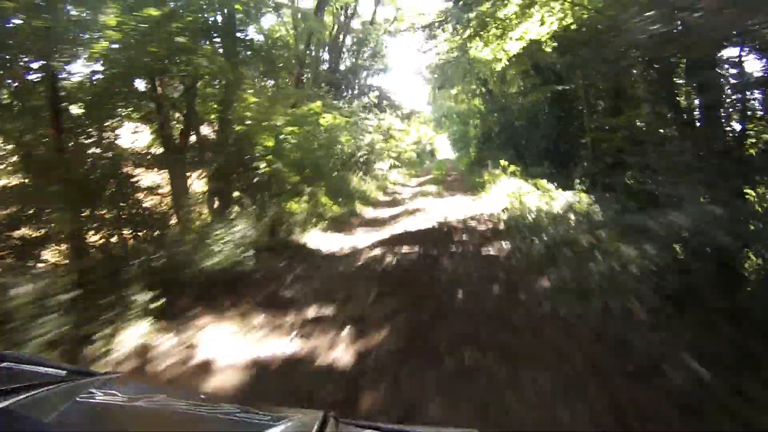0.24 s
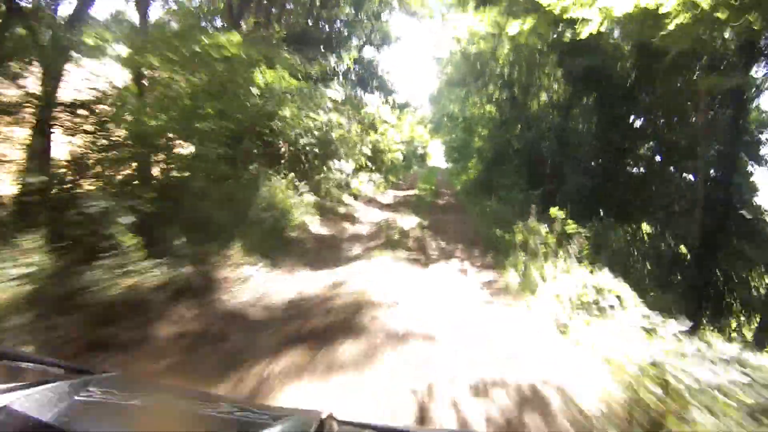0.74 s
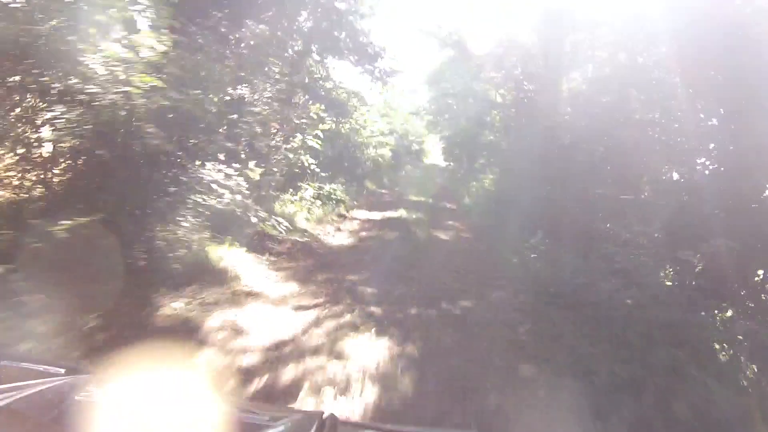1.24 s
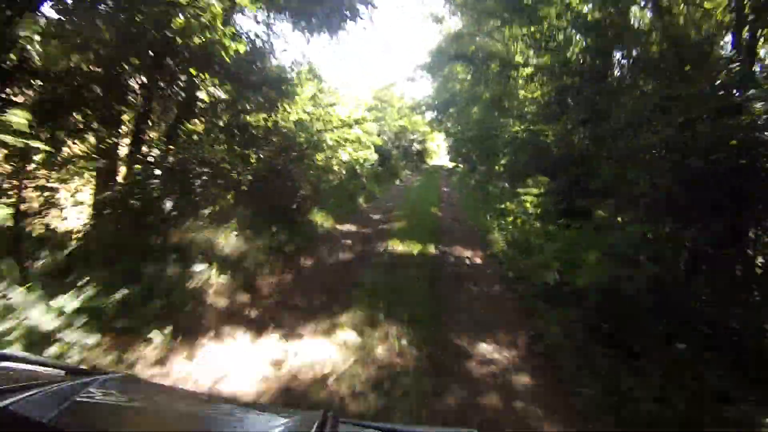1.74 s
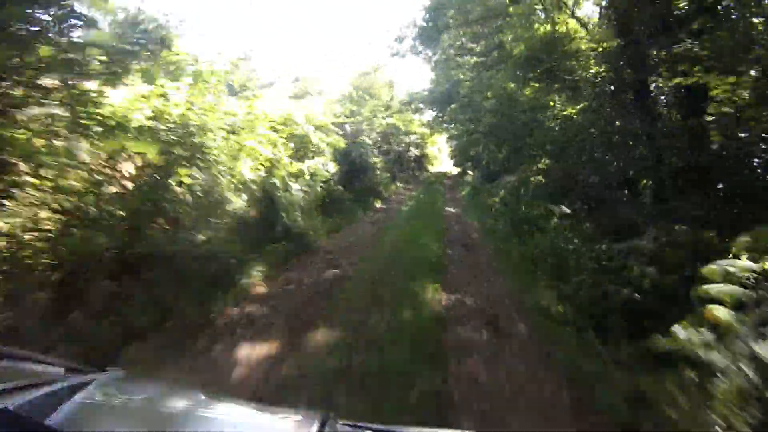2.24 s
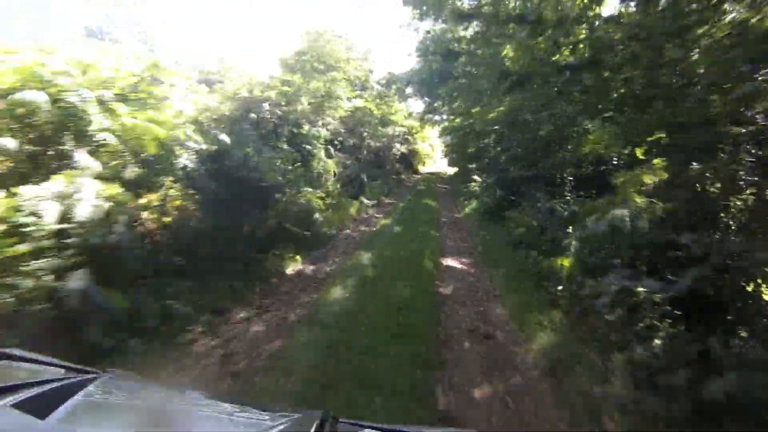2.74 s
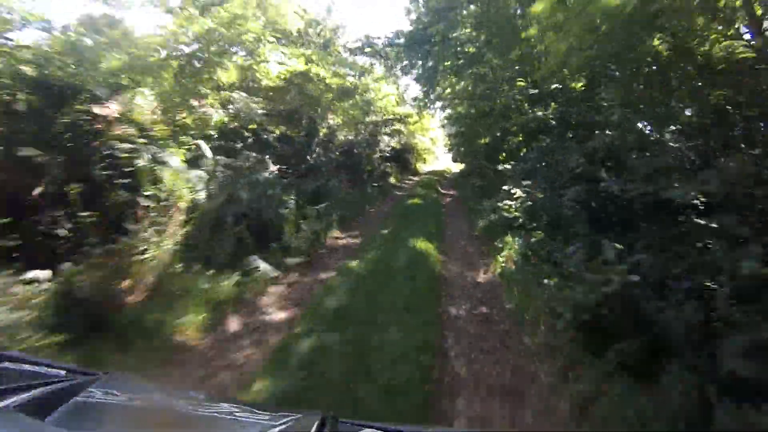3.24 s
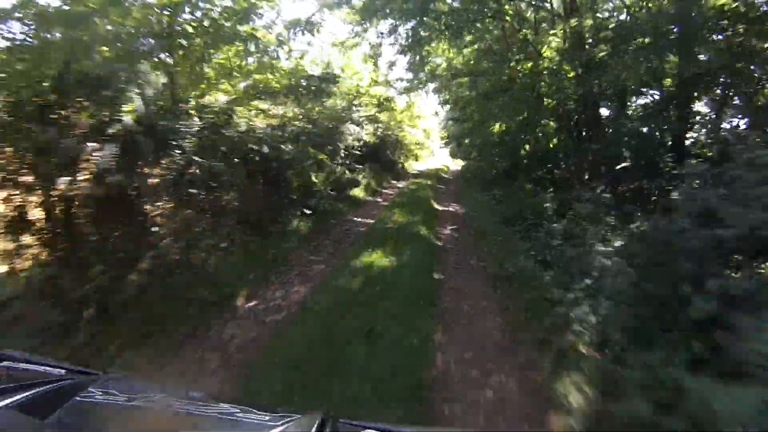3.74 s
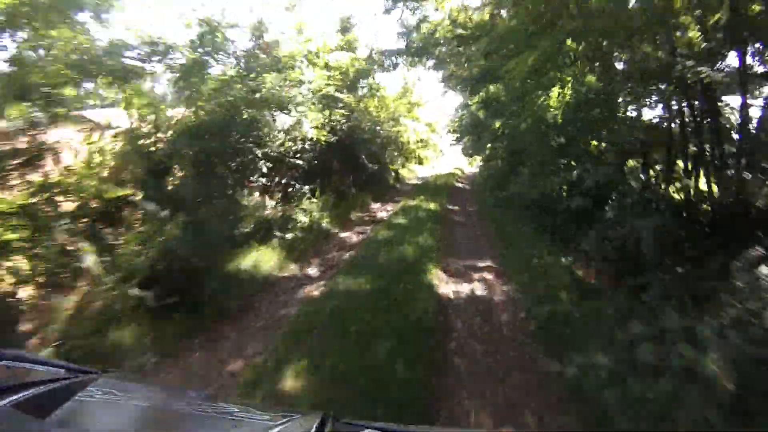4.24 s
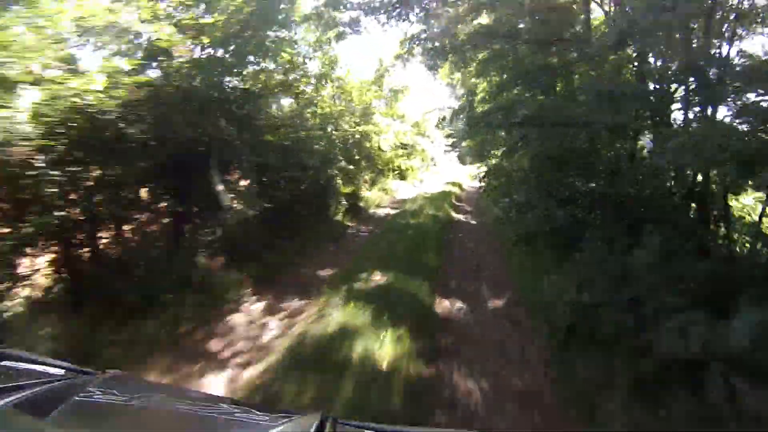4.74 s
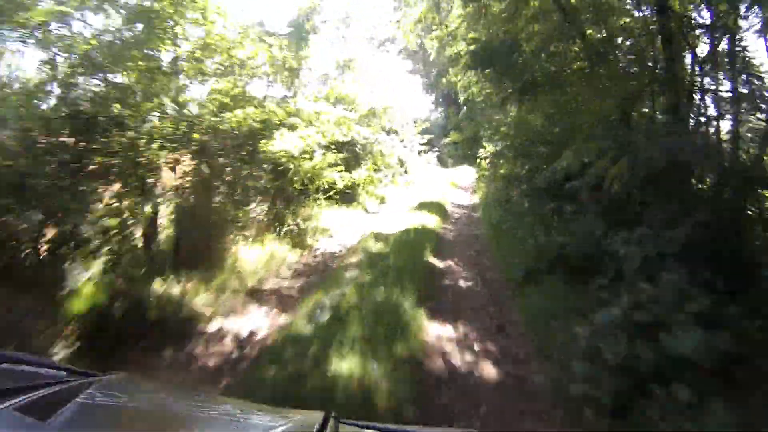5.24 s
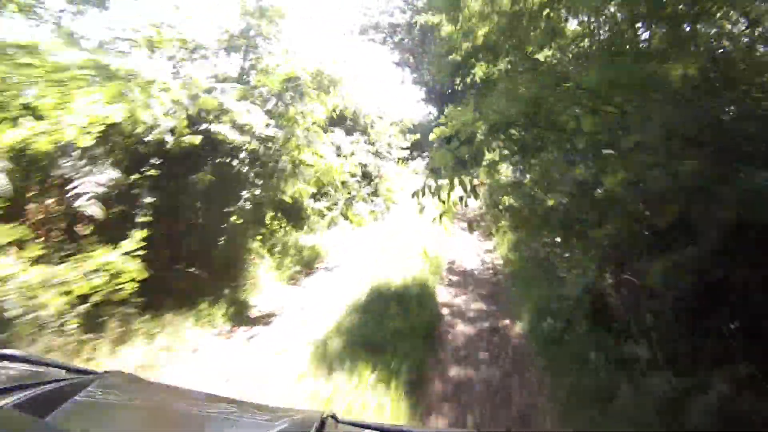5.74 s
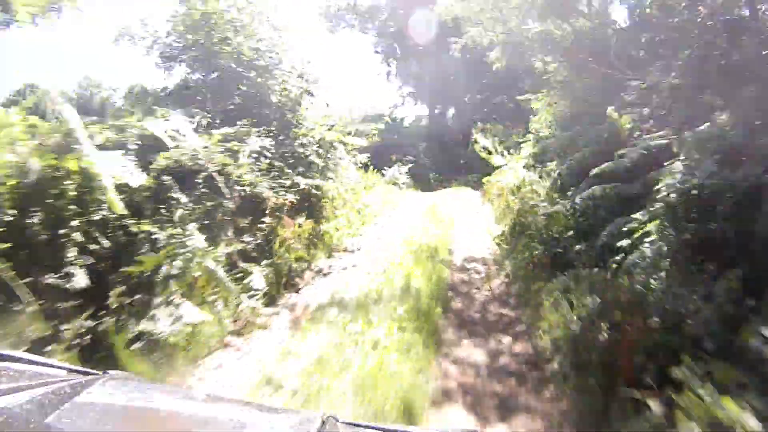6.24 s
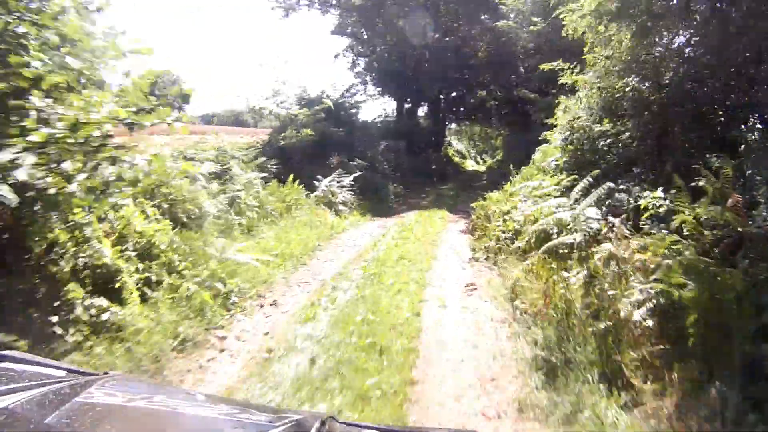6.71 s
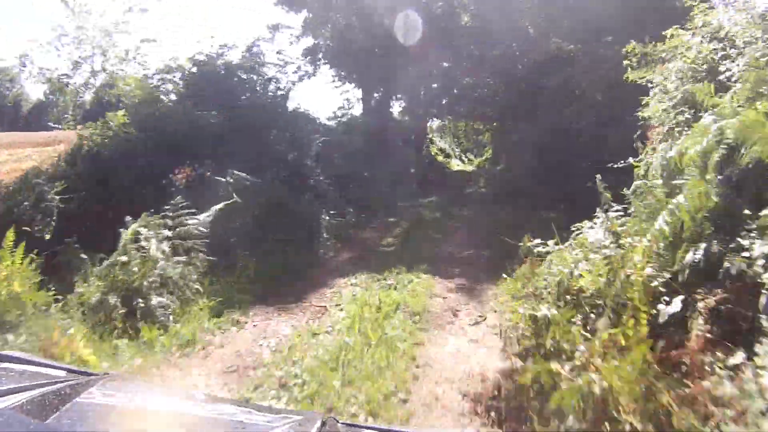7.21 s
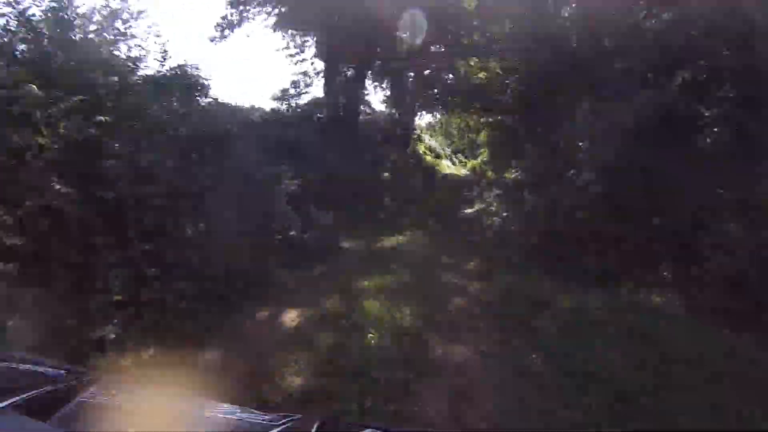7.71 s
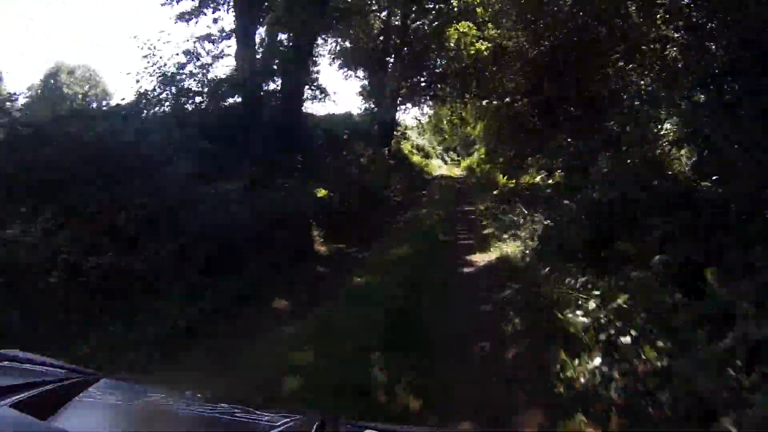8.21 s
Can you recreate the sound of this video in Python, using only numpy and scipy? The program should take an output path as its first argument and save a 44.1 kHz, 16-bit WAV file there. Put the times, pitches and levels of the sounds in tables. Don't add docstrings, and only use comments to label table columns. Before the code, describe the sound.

Heard from on board, a coarse engine clatters and whines over low rumble and bump booms until a twig cracks hard against the case.

```python
import sys
import numpy as np
from scipy import signal
from scipy.fft import rfft, irfft, next_fast_len
from scipy.io import wavfile
from scipy.ndimage import uniform_filter1d

SR = 44100
rng = np.random.default_rng(int(sys.argv[2]) if len(sys.argv) > 2 else 0)


def generate_wav(signal):
    frames = np.transpose(np.atleast_2d(signal))
    scaled = np.clip(frames, -1, 1) * 32767
    pcm = np.round(scaled).astype(np.int16)
    wavfile.write(sys.argv[1], SR, pcm)


def volts_from_decibels(level):
    exponent = np.asarray(level, float) / 20
    return 10 ** exponent


N = 373514

# start_s, firings_per_s
FIRING_RATE = [(0.0, 63.2), (0.5, 63.4), (0.8, 65.8), (1.33, 67.0), (1.65, 71.5), (2.1, 73.8), (2.85, 76.1),
               (3.15, 75.3), (3.75, 65.9), (4.05, 63.0), (4.3, 61.7), (5.25, 60.3), (5.6, 62.9),
               (6.3, 72.4), (6.6, 74.6), (7.45, 77.4), (8.0, 81.5), (8.47, 86.6)]


def unit(x):
    return x / np.sqrt(np.mean(x ** 2) + 1e-20)


def curves(rows):
    s, *cols = np.transpose(rows)
    return [np.interp(np.arange(N) / SR, s, c) for c in cols]


def wobble(knots_per_s):
    knots = rng.standard_normal(int(N * knots_per_s / SR) + 4)
    return signal.resample(knots, next_fast_len(N))[:N]


def slope(points, hz):
    f, db = np.transpose(points)
    return volts_from_decibels(np.interp(np.log(hz + 1), np.log(f), db))


def humps(modes, hz, steep):
    power = sum(volts_from_decibels(2 * db) / (1 + ((hz - c) * 2 / w) ** 2) ** steep for c, w, db in modes)
    return np.sqrt(power)


def coloured(x, gain):
    m = next_fast_len(N + SR)
    m += m % 2
    cep = irfft(np.log(gain(np.fft.rfftfreq(m, 1 / SR)) + 1e-6), m)
    cep[1:m // 2] *= 2
    cep[m // 2 + 1:] = 0
    response = np.exp(rfft(cep))
    return unit(irfft(rfft(x, m) * response, m)[:N])


def patchy(patchy_db):
    z = signal.stft(rng.standard_normal(N), nperseg=512)[2]
    field = uniform_filter1d(rng.standard_normal(z.shape), size=6, axis=0)
    field = uniform_filter1d(field, size=8, axis=1)
    return signal.istft(z * volts_from_decibels(patchy_db * unit(field)), nperseg=512)[1][:N]


def case_gain(hz):
    # centre_hz, width_hz, level_db
    case_modes = [(553, 173, -6), (770.4, 132, -7.5), (845, 26, -7.5), (881, 64, -4.5), (1010, 156, -17.5),
                  (1377, 67, -0.5), (1439, 594, -3.5), (2520, 1780, -9), (3266, 790, -8),
                  (4300, 670, -16.5), (5940, 1300, -23), (7260, 860, -32.5), (8100, 290, -37),
                  (10500, 700, -52)]
    # freq_hz, level_db
    leak = [(300, -33), (450, -29), (1100, -16.5), (2000, -20.5), (3600, -28), (5000, -39), (8500, -72),
            (10400, -44.5), (11000, -56), (13200, -70), (14200, -72), (15400, -80)]
    # centre_hz, width_hz, depth (0-1)
    notches = [(609, 47, 0.28), (1155, 100, 0.5), (1253, 26, 0.7), (2360, 75, 0.57), (3870, 235, 0.67),
               (4880, 150, 0.52), (6310, 150, 0.63), (6720, 140, 0.1), (7970, 250, 0)]
    dips = np.prod([1 - np.clip(d, 0, .95) / (1 + ((hz - c) * 2 / w) ** 2) for c, w, d in notches], axis=0)
    return np.hypot(humps(case_modes, hz, steep=2.14), slope(leak, hz)) * dips


def frame_gain(hz):
    # centre_hz, width_hz, level_db
    frame_modes = [(38.6, 21, 6), (75.4, 34, -18), (101.9, 16.4, 5), (132.4, 24.7, 1.5), (144, 19, -21),
                   (240, 47, -8), (264, 45.5, -3.5), (289.6, 18, -5.5), (350, 38, -20.5)]
    return humps(frame_modes, hz, steep=1.45) * hz ** 2 / (hz ** 2 + 22 ** 2)


def squeak():
    # start_s, length_s, centre_hz, level_db
    dust_ring = (.208, .03, 9300, -52)
    start_s, length_s, centre_hz, level_db = dust_ring
    across = (np.arange(N) / SR - start_s) / length_s * 2 - 1
    shape = np.clip(1 - across ** 2, 0, 1)
    hiss = coloured(rng.standard_normal(N), lambda hz: 1 / (1 + ((hz - centre_hz) / 350) ** 4))
    return volts_from_decibels(level_db) * shape * hiss


def grit(gain):
    # start_s, peak_db
    clear_ticks = [(0.2753, -36), (0.4648, -42), (0.5477, -36), (0.557, -37), (0.5931, -38), (0.7043, -38),
                   (0.8036, -35), (1.1812, -37), (1.3688, -39), (1.695, -34), (2.5147, -43), (3.085, -37),
                   (3.3124, -40), (3.4516, -40), (3.4992, -36), (3.7299, -38), (3.7377, -35), (3.8372, -34),
                   (4.17, -38), (4.7551, -44), (4.7671, -44), (4.9322, -41), (5.1462, -41), (5.1544, -45),
                   (6.6702, -43), (7.0524, -42), (7.3652, -44), (7.456, -43), (7.5906, -41), (7.652, -40),
                  (7.7179, -30), (8.078, -43), (8.2935, -44), (8.4088, -40)]
    # freq_hz, level_db
    tick_colour = [(2500, -38), (6000, -1), (9000, 2.5), (13000, 0), (14500, -13), (16000, -20)]
    per_s = 150 * volts_from_decibels(3.3 * wobble(12))
    faint_db = -59 + 5.3 * np.minimum(rng.exponential(size=N), 3)
    hits = (rng.random(N) < per_s / SR) * volts_from_decibels(faint_db) * gain
    for start_s, peak_db in clear_ticks:
        hits[round(start_s * SR)] = volts_from_decibels(peak_db)
    t = np.arange(300) / SR
    burst = np.convolve(hits, volts_from_decibels(-60 * t / 0.0068))[:N] * rng.standard_normal(N)
    return volts_from_decibels(-2.5) * coloured(burst, lambda hz: slope(tick_colour, hz)) * np.std(burst)


def tyres(rumble_db):
    return volts_from_decibels(rumble_db + 0.65 + 0.76 * wobble(12)) * coloured(patchy(patchy_db=0.7), frame_gain)


def knocks():
    # start_s, peak_db, ring_hz
    knock_events = [(0.32, -7.5, 278), (0.585, -7, 274), (0.618, -12.5, 254), (1.76, -17.5, 232),
                    (2.616, -10.5, 266), (2.772, -12.5, 240), (5.042, -13.5, 272), (5.607, -21, 264),
                    (5.809, -15, 284), (6.3, -25, 264), (6.418, -20, 267.6), (6.978, -14, 284),
                    (7.262, -17, 265.7), (7.901, -12, 243), (8.452, -19.5, 198.2)]
    out, edge, t = np.zeros(N + SR), np.zeros(N + SR), np.arange(SR // 8) / SR
    puffs = rng.standard_normal((len(knock_events), len(t)))
    for (start_s, peak_db, ring_hz), puff in zip(knock_events, puffs):
        at = round(start_s * SR)
        ring = np.sin(2 * np.pi * ring_hz * t) * volts_from_decibels(-60 * t / 0.11)
        out[at:][:len(t)] += volts_from_decibels(peak_db + 1.5) * ring * (1 - np.exp(-t / 0.0022))
        edge[at:][:len(t)] += volts_from_decibels(peak_db - 60 * t / 0.055) * puff
    dull = coloured(edge[:N], lambda hz: case_gain(hz) / (1 + (hz / 1600) ** 4) * (1 + 600 / (hz + 100)))
    return out[:N] + volts_from_decibels(-10.5) * dull * np.std(edge)


def mount():
    # start_s, peak_db, held_s, ring_hz
    bumps = [(.07, -10.5, .01, 36.9), (.3, -8.5, .03, 38), (.7, -9.5, 0.06, 39.9), (.89, -16, 0.12, 39.7),
             (1.16, -11.5, .42, 39.6), (1.67, -11, 0.57, 38.4), (2.29, -5.5, .01, 38),
             (2.5, -13.5, 0.11, 35.1), (2.78, -8.5, .01, 37.5), (2.92, -9.5, .01, 36.6),
             (3.07, -5, 0.009, 38.33), (3.28, -17, 0.34, 40), (3.888, -6.5, 0.037, 41.8),
             (4.17, -10.5, 0.0089, 38.2), (4.44, -12.5, .2, 35.8), (4.8, -9, 0.13, 37.75),
             (5.14, -9, 0.023, 38.06), (5.28, -11, .22, 38.6), (5.76, -11, 0.13, 36.27),
             (6.06, -24, 0.11, 37.2), (6.35, -20, .01, 37.4), (6.58, -13.5, 0.024, 39.43),
             (6.77, -20.5, .01, 38.22), (7.08, -10, 0.042, 38.6), (7.44, -9, 0.14, 39.86),
             (7.69, -9, 0.032, 38.34), (7.83, -3.5, 0.0082, 38.3), (7.97, -12.5, 0.019, 33.36),
             (8.26, -20, 0.11, 35.3), (8.46, -9, 0.011, 38.64)]
    rise_db_per_s, fall_db_per_s = 188, 179
    t = np.arange(0, N, 32) / SR
    swells_db = [peak_db - rise_db_per_s * np.maximum(s - t, 0) - fall_db_per_s * np.maximum(t - s - held_s, 0)
                 for s, peak_db, held_s, _ in bumps]
    level_db = curves(np.c_[t, np.max(swells_db, axis=0)])[0]
    ring_hz = curves(bumps)[-1]
    phase = 2 * np.pi * np.cumsum(ring_hz + 1.45 * wobble(7.6)) / SR
    return volts_from_decibels(level_db + .8) * (1 + .25 * wobble(25)) * np.sin(phase)


def twig():
    # start_s, peak_db, ring_hz, hiss_db, t60_s
    contacts = [(5.903, 1.5, 4020, -3.5, 0.0079), (5.905, -11.5, 9500, -21, 0.013),
                (5.9039, -8.5, 2460, -0.5, 0.037), (5.907, -19, 13000, -13, .015),
                (5.913, -1, 2240, -8.5, 0.021), (5.917, -11, 2590, -32, 0.022),
                (5.923, -5, 1970, -8, 0.0058), (5.926, -13.5, 3040, -18, 0.023),
                (5.928, -3.5, 4300, -3.5, 0.011), (5.9357, -15.5, 4560, -6, .015),
                (5.937, -7, 1830, -11, 0.013), (5.9418, -21.5, 2560, -2, .03),
                (5.949, -26, 2680, -25, 0.033), (5.962, -30, 2480, -7, 0.05)]
    # freq_hz, level_db
    hiss_colour = [(200, 6), (1000, 0), (3000, 2), (7000, -4.5), (11000, -15), (13500, -9), (15000, -21),
                   (16500, -39)]
    out, wide, t = np.zeros(N), np.zeros(N), np.arange(SR // 16) / SR
    noise = rng.standard_normal((len(contacts), 2, len(t)))
    for (start_s, peak_db, ring_hz, hiss_db, t60_s), (hiss, drift) in zip(contacts, noise):
        at = round(start_s * SR)
        ring = np.sin(2 * np.pi * ring_hz * t + .11 * np.cumsum(drift))
        body = volts_from_decibels(peak_db - 60 * t / t60_s) * (1 - np.exp(-t / 0.00036))
        out[at:][:len(t)] += body * ring
        wide[at:][:len(t)] += body * volts_from_decibels(hiss_db) * hiss
    scrape = volts_from_decibels(-22.5 - 60 * (t / 0.065) ** 2) * rng.standard_normal(len(t))
    wide[round(contacts[0][0] * SR):][:len(t)] += scrape
    return out + coloured(wide, lambda hz: slope(hiss_colour, hz)) * np.std(wide)


def whine(turns, firings):
    # multiple, level_db
    pipe_orders = [(7, -5), (7.5, -8), (8, 0), (8.5, -6), (9, -1), (9.5, -2), (10, 0), (10.5, 0), (11, 0),
                   (11.5, -4), (12, 0), (12.5, -6), (13, -1), (13.5, -6), (14, -4), (14.5, -4), (15, -4)]
    lines = np.zeros(N)
    for k, level_db in pipe_orders:
        phase = 2 * np.pi * k * turns + .8 * wobble(8) + rng.uniform(0, 2 * np.pi)
        lines += volts_from_decibels(level_db + 2.8 * wobble(5)) * np.sin(phase)
    mix = unit(lines) + .8 * unit(firings)
    return coloured(mix, lambda hz: case_gain(hz) / (1 + (hz / 960) ** 12) / (1 + (650 / (hz + 1)) ** 8))


def engine(load_db, racket_db):
    # order, mode_hz, width_hz, peak_db, floor_db
    hum_orders = [(1, 74.8, 6.8, -19.5, -31.5), (2, 131.5, 3.7, -17.5, -29)]
    rate, = curves(FIRING_RATE)
    turns = np.cumsum(rate * (1 + .001 * wobble(4))) / SR
    at = np.flatnonzero(np.diff(np.floor(turns)))
    cylinder = np.where(np.arange(len(at)) % 2, 1, .3)
    firings = np.zeros(N)
    firings[at] = volts_from_decibels(1.2 * rng.standard_normal(len(at))) * cylinder
    throb = coloured(firings, lambda hz: frame_gain(hz) / (1 + (190 / (hz + 1)) ** 8))

    hum = np.zeros(N)
    for k, mode_hz, width_hz, peak_db, floor_db in hum_orders:
        level = volts_from_decibels(peak_db) / (1 + ((k * rate - mode_hz) / width_hz) ** 2) ** 2 + volts_from_decibels(floor_db)
        hum += level * np.sin(2 * np.pi * k * turns)
    hum /= volts_from_decibels(racket_db)

    gate = 1 + 0.098 * np.cos(np.pi * turns) + 0.07 * np.cos(2 * np.pi * turns)
    lumps = volts_from_decibels(0.15 * wobble(7) + 0.83 * wobble(45))
    clatter = coloured(gate * lumps * patchy(patchy_db=-0.82), case_gain)
    resonant = coloured(lumps ** 2 * patchy(patchy_db=-3.0),
                        lambda hz: case_gain(hz) / (1 + ((hz - 820) / 160) ** 4))
    pipe = volts_from_decibels(-5.5) * whine(turns, firings) + volts_from_decibels(-7) * resonant
    pipe *= volts_from_decibels(0.46)
    rock = volts_from_decibels(6.5) * volts_from_decibels(1.6 * wobble(5.1)) * np.sin(np.pi * turns)
    return clatter + volts_from_decibels(load_db) * pipe + volts_from_decibels(-8.5) * throb + rock, hum


def gain_control():
    # start_s, depth_db
    ducks = [
        (0, 1.5),
        (3.87, 4.5),
        (4.95, 1.5),
        (5.5, 2),
        (5.902, 16.5),
        (7.84, 1.5),
    ]
    grip_s, hold_s, release_db_per_s = 0.0024, 0.087, 12
    t = np.arange(N) / SR
    cuts_db = []
    for start_s, depth_db in ducks:
        left_db = depth_db - release_db_per_s * np.maximum(t - start_s - hold_s, 0)
        cuts_db.append(np.clip((t - start_s) / grip_s + 1, 0, 1) * np.maximum(left_db, 0))
    return volts_from_decibels(-np.max(cuts_db, axis=0))


def scene():
    # start_s, load_db, shake_db
    drive = [(0, -4.5, 0.5), (.5, -2.5, -1.5), (1.08, -2.5, 1.5), (1.4, 0, -0.5), (2, -0.5, 1),
             (2.85, 1.5, -.5), (3.4, .5, 0), (3.8, -5.5, 1.5), (4.3, -1.5, 0), (4.7, -2.5, 0.2),
             (5.2, .5, -.5), (5.7, -1.5, 0.5), (6.65, 2.5, 2.5), (7.1, 2, 1), (7.45, 3.5, 0),
             (7.9, 1.5, -1), (8.15, 4.5, 1.5), (8.47, 5, 2.5)]
    slap_s, racket_db, cruise_per_s = 5.901, -29.5, 69.6
    gain = gain_control()
    since_s = np.arange(N) / SR - slap_s
    duck = np.where(since_s > 0, volts_from_decibels(-16 * np.exp(-np.abs(since_s) / 0.066)), 1)
    duck = uniform_filter1d(duck, size=130)
    load_db, shake_db = curves(drive)
    rumble_db = 10.5 - 0.0231 * (curves(FIRING_RATE)[0] - cruise_per_s)
    racket, hum = engine(load_db, racket_db)
    running = volts_from_decibels(racket_db + shake_db) * (volts_from_decibels(3.0) * racket + tyres(rumble_db) + hum)
    vehicle = gain * running + duck * (mount() + knocks())
    return (vehicle + grit(0.75 * gain * volts_from_decibels(1.5 * shake_db)) + squeak() + twig())[None]


def low_pass(x):
    return signal.sosfilt(signal.butter(12, 15390, fs=SR, output="sos"), x)


def record(dry):
    held = dry / (1 + np.abs(dry / .97) ** 10) ** (1 / 10)
    return low_pass(held)


dry = scene()
out = record(dry)
generate_wav(out)
```